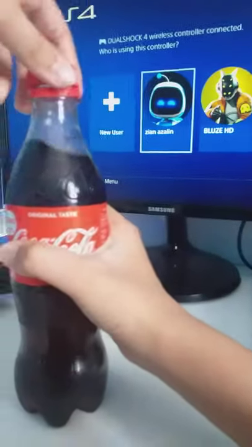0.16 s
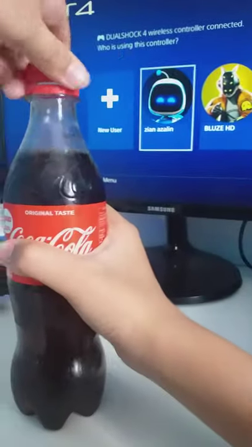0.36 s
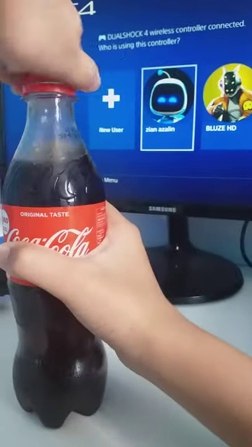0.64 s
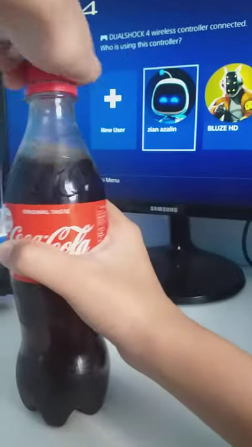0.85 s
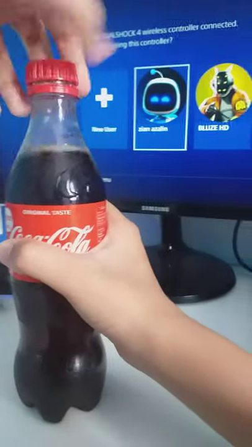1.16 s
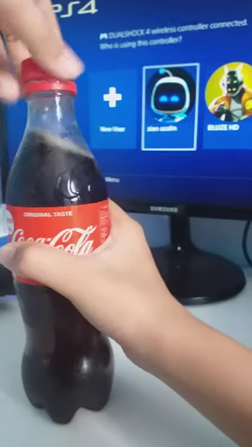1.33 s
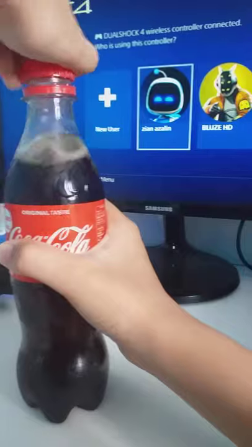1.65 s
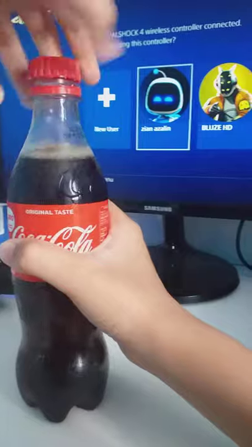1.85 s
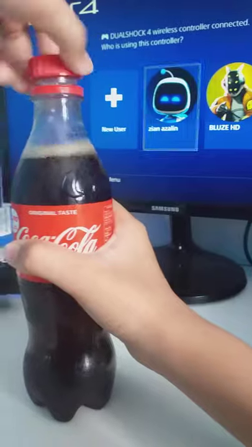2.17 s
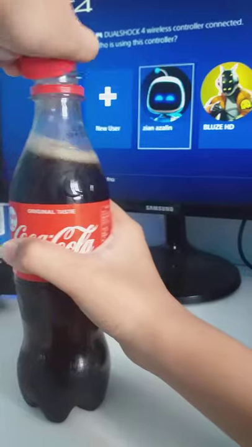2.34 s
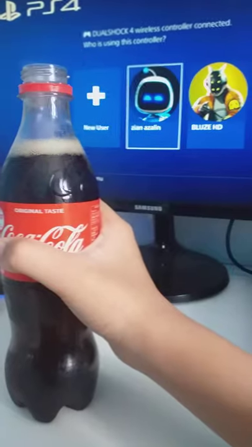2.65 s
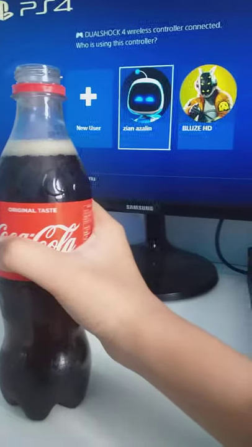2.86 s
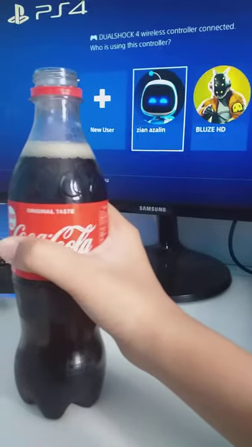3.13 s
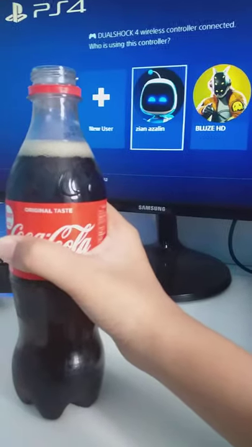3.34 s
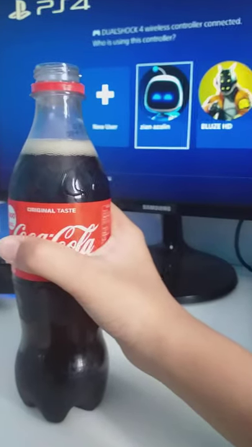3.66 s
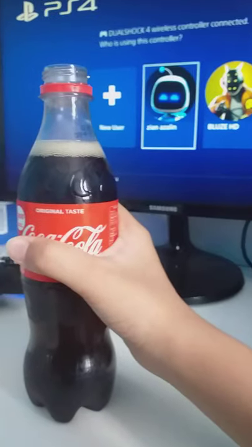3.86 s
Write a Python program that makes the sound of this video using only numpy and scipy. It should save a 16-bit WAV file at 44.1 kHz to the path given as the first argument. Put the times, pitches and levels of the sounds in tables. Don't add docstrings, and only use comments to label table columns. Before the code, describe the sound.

Close phone pickup of a screw cap twisting off a fizzy bottle, with a short hiss, cracks, plastic rubbing and knocks, then the cap bouncing and rattling to rest on a desk in a small, quiet room.

```python
import sys
import numpy as np
from scipy import signal
from scipy.fft import rfft, irfft
from scipy.io import wavfile

SR = 44100
rng = np.random.default_rng(int(sys.argv[2]) if len(sys.argv) > 2 else 0)


def transcribe(u):
    v = np.clip(np.atleast_2d(u).T, -1, 1)
    q = np.round(v * 32767).astype(np.int16)
    wavfile.write(sys.argv[1], SR, q)


def voltage_ratio(decibels):
    exponent = np.asarray(decibels, float) / 20
    return 10 ** exponent


N = 176400
TIME = np.arange(N) / SR


def rms_one(x):
    return x / np.sqrt(np.mean(x ** 2) + 1e-20)


def at_hz(points, hz):
    f, v = np.transpose(points)
    return np.interp(np.log(np.maximum(hz, 1)), np.log(f), v)


def shape_spectrum(x, spectrum):
    gain = voltage_ratio(at_hz(spectrum, np.arange(N // 2 + 1) * SR / N))
    return irfft(rfft(x) * gain, N)


def coloured(x, spectrum):
    return rms_one(shape_spectrum(x, spectrum))


def band(x, low_hz, high_hz, order=2):
    return signal.sosfilt(signal.butter(order, [low_hz, high_hz], "band", fs=SR, output="sos"), x)


def drift(rate):
    return np.interp(TIME * rate, np.arange(400), rng.standard_normal(400))


def swell(start, length, skew=1):
    return np.sin(np.pi * np.clip((TIME - start) / length, 0, 1) ** skew)


def resonator(hz, width):
    r = np.exp(-np.pi * width / SR)
    return [1, -2 * r * np.cos(2 * np.pi * hz / SR), r * r], r


def whistle(hz, width):
    a, _ = resonator(hz, width)
    once = signal.lfilter([1], a, rng.standard_normal(N + 4000))
    return rms_one(signal.lfilter([1, 0, -1], a, once)[4000:])


def resonate(x, hz, width):
    a, r = resonator(hz, width)
    return signal.lfilter([(1 - r * r) / 2, 0, (r * r - 1) / 2], a, x)


RISE_S = 0.00075


def fading(db, t60):
    t = TIME[:int(t60 * 1.5 * SR) + 99]
    return voltage_ratio(db - 60 * t / t60) * np.minimum(t / RISE_S, 1) ** 2


def mode(hz, db, t60):
    shape = fading(db, t60)
    return shape * np.sin(2 * np.pi * hz * TIME[:len(shape)])


def crack(noise, low_hz, high_hz, db, t60):
    shape = fading(0, t60)
    drive = shape * noise[:len(shape)]
    drive[int(RISE_S * SR)] += voltage_ratio(11) * np.sign(noise[0])
    x = band(drive, low_hz, high_hz, order=3)
    return voltage_ratio(db) * x / np.abs(x).max()


def add(out, s, sound):
    i = int(s * SR)
    out[i:i + len(sound)] += sound[:N - i]


def click(out, noise, s, db, hz, thud_db, edge_db, t60):
    add(out, s, crack(noise, hz / 1.313, hz * 1.313, db, t60))
    add(out, s, crack(noise[1000:], 877, 1840, db + thud_db, 0.031))
    add(out, s, crack(noise[3000:], hz * 0.57, hz * 1.87, db - 9, 0.027))
    add(out, s, crack(noise[4000:], 286, 744, db - 42, 0.038))
    add(out, s, crack(noise[5000:], 3851, 4648, db - 8.5, 0.012))
    add(out, s, crack(noise[2000:], 5360, 14000, db + edge_db, 0.0068))


# time in seconds, level in dB.
GATE_OPENING = [
    (0, -78),
    (.55, -79),
    (.7, -70),
    (1.3, -63.5),
    (1.65, -67.5),
    (2.0, -63.5),
    (3.0, -65),
    (4.0, -64.5),
]
# pitch in Hz, level in dB per Hz.
RUMBLE_TONE = [(26, -13.5), (45, -2.5), (92, -2.5), (217, -10.5), (838, -19.5), (1840, -30), (3850, -41.5),
               (4350, -24.5), (16000, -34.5)]
# pitch in Hz, width in Hz, level in dB over the room sound.
FAN_BANDS = [(94.3, 17, -7.5), (882, 20.2, -24), (1148, 35, -28), (2265, 240, -20.5), (3900, 330, -12.5),
             (6600, 310, -26.5)]


def background():
    air = coloured(rng.standard_normal(N), RUMBLE_TONE) * voltage_ratio(-2.0 + 0.397 * drift(4.0))
    fan = sum(voltage_ratio(db + 2.0 * drift(6.56)) * whistle(hz, width) for hz, width, db in FAN_BANDS)
    gate_db = np.interp(TIME, *np.transpose(GATE_OPENING))
    return voltage_ratio(gate_db) * (air + fan)


# pitch in Hz, level in dB per Hz.
HISS_TONE = [(300, -2), (1600, 1.5), (3000, -6), (7000, -4), (10000, -10.5), (13000, -6), (16000, -6.5)]


def phone_hiss():
    return voltage_ratio(-81.5) * coloured(rng.standard_normal(N), HISS_TONE)


# pitch in Hz, width in Hz, level in dB.
LEAK_WHISTLES = [(602, 140, -82.5), (1240, 150, -91.5), (2450, 260, -85), (5070, 700, -78.5)]
# pitch in Hz, level in dB per Hz.
PUFF_TONE = [(470, -64), (800, -29.5), (2530, -15.5), (3220, -8.5), (3560, -12.5), (5180, 5), (9330, -8),
             (12300, -1.5), (16000, -13)]


def gas():
    leak = sum(voltage_ratio(db) * whistle(hz, width) for hz, width, db in LEAK_WHISTLES)
    leak = leak * np.clip((0.298 - TIME) / 0.036 + 1, 0, 1)
    t = TIME - 0.3233
    hold_s, edge_s = 0.023, 0.0059
    lead = voltage_ratio(-11.5) * np.exp(-np.abs(t) / 0.042 * 2)
    burst = np.clip(t / edge_s + 1, 0, 1) * np.exp(-np.maximum(t - hold_s, 0) / edge_s)
    flutter = voltage_ratio(-43.5 + drift(107.0))
    return leak + flutter * (lead + burst) * coloured(rng.standard_normal(N), PUFF_TONE)


# start in seconds, peak level in dB, pitch in Hz, bright edge in dB over the peak.
SEAL_SNAPS = [(0.499, -21, 4330, 1), (0.521, -36, 4100, 1), (0.532, -30.5, 7050, 11.5),
              (0.5648, -12.5, 4510, -5.5), (0.602, -39, 4200, -6), (0.7905, -24.5, 3150, -12.5),
              (0.8893, -53, 2480, 2), (0.9074, -50, 2700, -2), (0.9767, -19.5, 3900, -24),
              (1.188, -38.5, 3600, -29), (1.2003, -38.5, 3800, -8.5), (1.2484, -18, 4310, -44),
              (1.3542, -32, 4000, -10.5), (1.419, -35.5, 3670, -28), (1.896, -27.5, 4220, 0),
              (2.134, -33.5, 4050, -1.5), (2.1427, -34.5, 3530, -19), (2.2552, -29, 4330, 2),
              (2.3145, -44.5, 3700, 4), (2.5645, -46, 4530, -9), (2.64, -54, 4300, 2)]


def snaps():
    out = np.zeros(N)
    for (s, db, hz, edge_db), noise in zip(SEAL_SNAPS, rng.standard_normal((25, 9000))):
        click(out, noise, s, db, hz, thud_db=-24.5, edge_db=edge_db, t60=0.0028)
    return out


# start in seconds, length in seconds, level in dB.
RUB_STROKES = [(0.544, 0.38, -68), (0.87, 0.16, -70), (0.971, 0.23, -57.5), (1.162, 0.28, -70),
               (1.347, 0.2, -62), (1.466, 0.11, -52.5), (1.519, 0.12, -64.5), (1.678, 0.063, -64.5),
               (1.734, 0.084, -58), (1.89, 0.15, -67), (2, 0.23, -54.5), (2.115, 0.28, -53.5),
               (2.298, 0.32, -64), (2.49, 1, -77), (3.114, 0.072, -67)]
# pitch in Hz, level in dB per Hz.
RUB_TONE = [(180, -13), (300, 1), (555, 7), (1580, -10.5), (3890, -2), (5340, -2.5), (9240, -29),
            (12500, -15.5), (16000, -14.5)]
# pitch in Hz, width in Hz, level in dB.
CAP_RESONANCES = [(1340, 250, -5), (2480, 94, 3.5), (3080, 400, -10.5), (4100, 330, 0.5), (5520, 780, -10),
                  (7700, 570, -10.5)]


def rub():
    grains_per_s = 1300 * voltage_ratio(5 * drift(30.0))
    grains = rng.random(N) < grains_per_s / SR
    grain_size = voltage_ratio(3.8 * np.minimum(rng.exponential(1, N), 4))
    grains = grains * grain_size * rng.choice([-1, 1], N)
    noise = rng.standard_normal(N) + rms_one(grains)
    rings = 0
    for k, (hz, width, db) in enumerate(CAP_RESONANCES):
        sign = (-1) ** k
        rings = rings + sign * voltage_ratio(db + 3.6 * drift(24.84)) * resonate(noise, hz, width)
    level = sum(voltage_ratio(db) * swell(s, length, 0.59) for s, length, db in RUB_STROKES)
    friction = coloured(noise, RUB_TONE) + voltage_ratio(3.5) * rms_one(rings)
    return level * voltage_ratio(2.5 * drift(40.45)) * rms_one(friction)


# start in seconds, level in dB, length in seconds.
GRIP_THUMPS = [
    (1.02, -56, .09),
    (1.74, -64, .07),
    (.65, -68, .06),
    (3.17, -61, .09),
]


def grip():
    level = sum(voltage_ratio(db) * np.exp(-((TIME - s - length / 2) / length * 2) ** 2) for s, db, length in GRIP_THUMPS)
    return level * rms_one(band(rng.standard_normal(N), 80, 240))


# start in seconds, peak level in dB, pitch in Hz.
THREAD_TICKS = [(0.982, -34, 4330), (1.0327, -42, 4760), (1.0555, -46, 4640), (1.066, -48, 4000),
                (1.0749, -37, 2820), (1.0878, -46, 3900), (1.179, -51, 4650), (1.2948, -53, 4210),
                (1.3967, -52, 3070), (1.4569, -53, 4340), (1.518, -44, 4400), (1.5328, -39.5, 4240),
                (1.539, -42, 4780), (1.566, -57, 3400), (1.6914, -56, 2740), (1.7445, -45, 3050),
                (1.7465, -41.5, 2600), (1.757, -55, 2600), (1.9197, -46.5, 2510), (2.2605, -36, 4400),
                (2.031, -36, 4100), (2.0434, -30, 4140), (2.056, -40, 4100), (2.13, -40, 3170),
                (2.137, -39, 4900), (2.4316, -51, 4690)]


def ticks():
    out = np.zeros(N)
    for (s, db, hz), noise in zip(THREAD_TICKS, rng.standard_normal((40, 900))):
        add(out, s, crack(noise, hz / 1.142, hz * 1.142, db, 0.0076))
    return out


# start in seconds, peak level in dB, pitch in Hz, bottle thud in dB over the peak.
CAP_KNOCKS = [(0.9984, -45, 3530, -10), (1.034, -49.5, 2450, -8), (1.0557, -35, 3900, -10.5),
              (1.0714, -35, 4400, -13), (1.088, -48, 3900, -4), (1.411, -41, 3600, 0),
              (1.478, -34, 3900, -6), (1.507, -36, 3680, -11.5), (1.7408, -27, 2870, -25),
              (2.038, -34.5, 4100, -18), (2.0466, -32.5, 4100, -18), (2.065, -32.5, 3730, -12.5),
              (2.08, -35.5, 4100, -15), (2.0941, -37.5, 3950, -10), (2.109, -37.5, 3940, -8.5),
              (2.199, -24.5, 2930, -11), (2.2225, -36, 4500, -8), (2.2422, -22.5, 4500, -9.5),
              (2.261, -51, 4740, -6), (2.2744, -21, 3480, -14)]


def knocks():
    out = np.zeros(N)
    for (s, db, hz, thud_db), noise in zip(CAP_KNOCKS, rng.standard_normal((25, 9000))):
        click(out, noise, s, db, hz, thud_db, edge_db=-28, t60=0.0081)
    return out


# start in seconds, peak level in dB.
WALL_JOLTS = [
    (1.2484, -46.5),
    (1.7407, -47),
    (1.058, -54),
    (1.1, -55.5),
]


def jolts():
    out = np.zeros(N)
    for (s, db), noise in zip(WALL_JOLTS, rng.standard_normal((9, 9000))):
        add(out, s, crack(noise, 286, 744, db, 0.076))
    return out


# start in seconds, pitch in Hz, level in dB.
NECK_JOLTS = [
    (2.168, 560, -51),
    (2.131, 540, -53),
    (2.2006, 620, -42),
    (2.2436, 700, -37),
    (1.392, 1480, -46),
    (1.398, 1500, -47),
    (1.355, 1400, -52),
]


def neck():
    out = voltage_ratio(-64.5) * swell(1.953, 0.72) * whistle(610, 230)
    add(out, 2.2755, mode(757, -30, 0.08))
    for s, hz, db in NECK_JOLTS:
        add(out, s, mode(hz, db, 0.04))
    return out


# lowest pitch in Hz, highest pitch in Hz, level in dB, t60 in seconds.
CAP_MODES = [(1056, 2720, -18.5, 0.036), (3400, 6960, 0, 0.005), (2350, 3960, -15.5, 0.03),
             (9450, 18600, -25.5, 0.021)]
# pitch in Hz, level in dB, t60 in seconds.
DESK_MODES = [(118, -44, 0.34), (469.6, -38.5, .2), (770, -35.5, 0.068), (923, -36.5, 0.14),
              (1110, -27.5, 0.085), (1350, -33, .15), (2005, -26.5, 0.12), (2270, -32.5, 0.16),
              (4130, -28, 0.015)]


def touch(out, rim, noise, s, db, rim_db, desk_db):
    for k, (low, high, level_db, t60) in enumerate(CAP_MODES):
        add(out, s, crack(noise[k * 500:], low, high, db + level_db, t60))
    add(rim, s, crack(noise[2000:], 6770, 8180, db + rim_db, 0.0087))
    add(rim, s, crack(noise[2500:], 8300, 14500, db + rim_db - 12, 0.0087))
    desk = db + desk_db
    add(out, s, crack(noise[3000:], 717, 2602, desk - 17.5, 0.12))
    for (hz, level_db, t60), chance in zip(DESK_MODES, noise):
        hz = hz * (1 + 0.018 * np.sin(9 * chance))
        add(out, s, np.sign(chance) * mode(hz, desk + level_db + 2 * chance, t60))
    add(out, s, crack(noise[3500:], 237, 618, desk - 34.5, 0.13))


# start in seconds, peak level in dB, then rim and desk in dB over the peak.
CAP_BOUNCES = [
    (3.1525, -4.5, -22, -9),
    (3.2991, -20, -6, 5.5),
    (3.3029, -24.5, -5, 1.5),
    (3.3108, -12, -3, -11.5),
    (3.1575, -20.5, -19, -7),
    (3.3162, -12, -2.5, -21),
    (3.319, -22, -12, 3),
    (3.3566, -37.5, 9, 17),
    (3.3695, -29, 2, 12.5),
]
# start in seconds, dB over the spin level.
SPIN_TAPS = [(3.3793, 3), (3.3908, 9), (3.397, 0), (3.4067, 6), (3.4148, 4), (3.4218, 5.5), (3.4279, 6),
             (3.4346, -3), (3.4393, 2.5), (3.4445, -9), (3.448, -8), (3.454, -3.5)]
# start in seconds, level in dB, length in seconds.
LAST_ROCKS = [
    (3.473, -45, .016),
    (3.512, -55, 0.0087),
    (3.533, -52.5, 0.011),
    (3.624, -60, 0.0073),
    (3.666, -65, 0.014),
]


def dropped_cap():
    body_db = -12
    hits = list(CAP_BOUNCES)
    hits += [(s, -36 + body_db + db, -body_db, 16.5) for s, db in SPIN_TAPS]
    for s, db, length in LAST_ROCKS:
        hits += [(s + length * k / 3, db + body_db, -body_db, 6) for k in range(4)]
    out, rim = np.zeros((2, N))
    for hit, noise in zip(hits, rng.standard_normal((50, 30000))):
        touch(out, rim, noise, *hit)
    return out, rim


# pitch in Hz, width in Hz, level in dB.
HUM_MODES = [(472, 90, 0.5), (897, 85, 0), (1147, 79, -3.5), (1405, 130, -2), (2250, 130, -6.5)]


def desk_hum():
    noise = rms_one(band(rng.standard_normal(N), 500, 2300))
    modes = sum(voltage_ratio(db + 1.9 * drift(12.0)) * whistle(hz, width) for hz, width, db in HUM_MODES)
    return voltage_ratio(-68.5) * swell(3.302, 0.61, 0.76) * (noise + modes)


# pitch in Hz, t60 in seconds.
ROOM_RING = [(200, 0.84), (1000, 0.48), (3500, 0.32), (8000, 0.23), (15000, 0.41)]


def room(x):
    t = TIME[:SR // 2]
    edges = 200 * 2 ** np.arange(0, 6.6, .5)
    tail = 0
    for low, high in zip(edges, edges[1:]):
        noise = band(rng.standard_normal(len(t)), low, high)
        late = voltage_ratio(-60 * t / at_hz(ROOM_RING, np.sqrt(low * high)))
        early = voltage_ratio(-6.5 + 23.5 - 60 * t / 0.01)
        tail = tail + noise * (late + early)
    tail = tail * np.minimum(t / .002, 1) / np.sqrt(.01 * SR)
    return signal.fftconvolve(x, tail)[:N]


def scene():
    near = gas() + snaps() + ticks() + knocks() + jolts()
    air = neck()
    far, rim = dropped_cap()
    bottle_send = voltage_ratio(-17) * (near + 0.5 * air)
    desk_send = voltage_ratio(-8) * (far + voltage_ratio(-4) * rim)
    wet = room(bottle_send + desk_send)
    dry_sources = near + air + rub() + grip() + far + rim + desk_hum()
    return (dry_sources + wet + background() + phone_hiss())[None]


def low_pass(x):
    return signal.sosfilt(signal.butter(12, 16840, fs=SR, output="sos"), x)


# pitch in Hz, gain in dB.
MIC_PORT = [(1200, 1), (1800, -2.5), (2500, 0.5), (4200, 0), (5800, -2), (8000, -0.5), (9600, -5),
            (12500, 2.5), (16000, 0.5)]


def record(dry):
    x = shape_spectrum(dry, MIC_PORT)
    x = band(x, 42, 15900, order=10)
    return low_pass(x)


dry = scene()
out = record(dry)
transcribe(out)
```